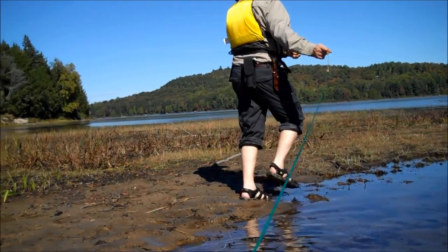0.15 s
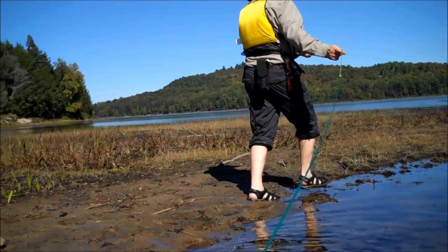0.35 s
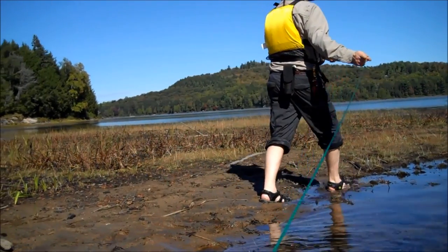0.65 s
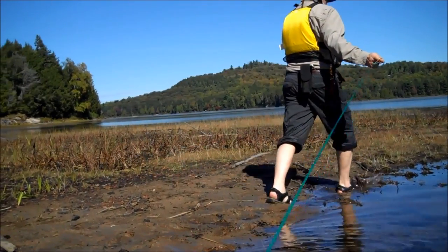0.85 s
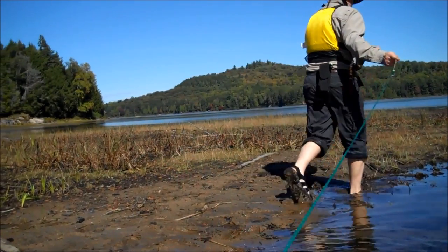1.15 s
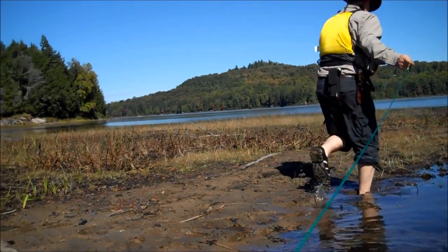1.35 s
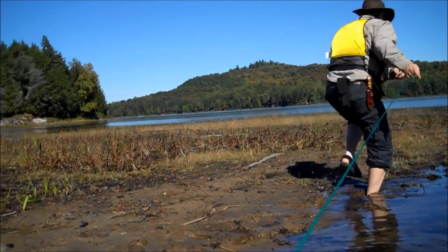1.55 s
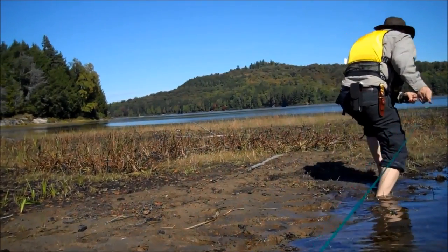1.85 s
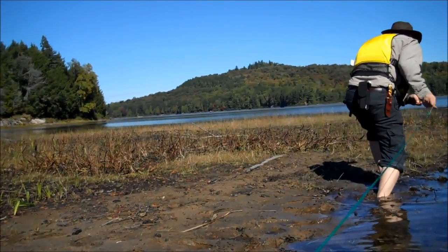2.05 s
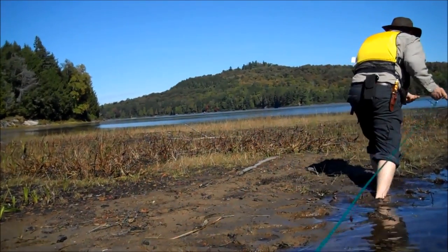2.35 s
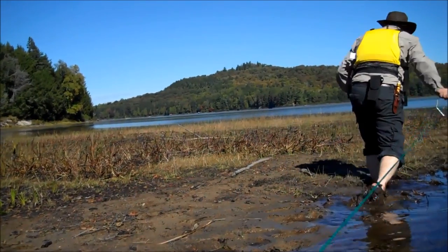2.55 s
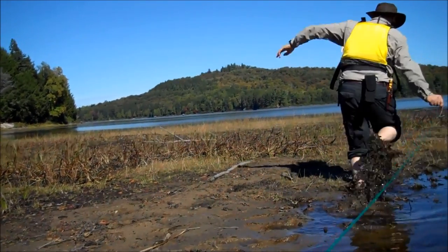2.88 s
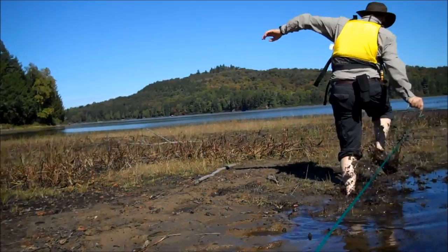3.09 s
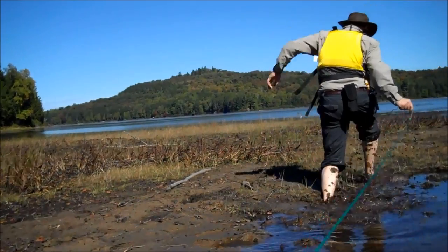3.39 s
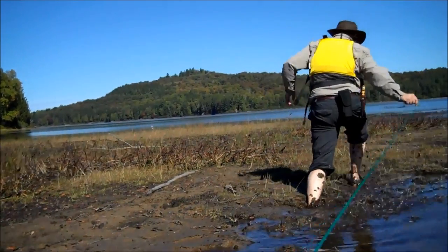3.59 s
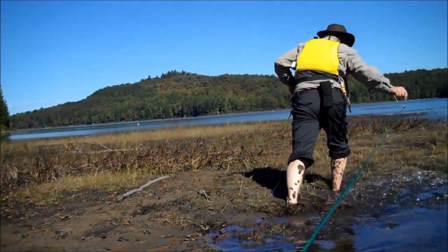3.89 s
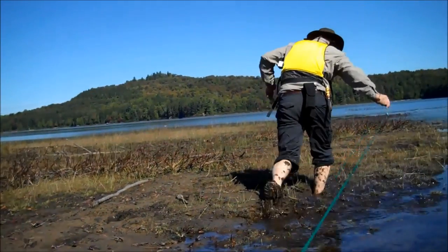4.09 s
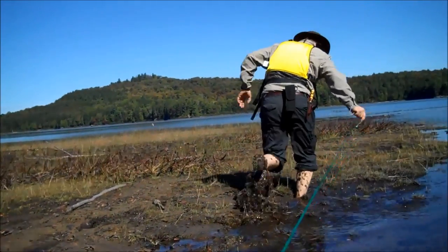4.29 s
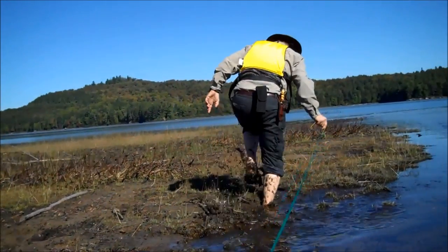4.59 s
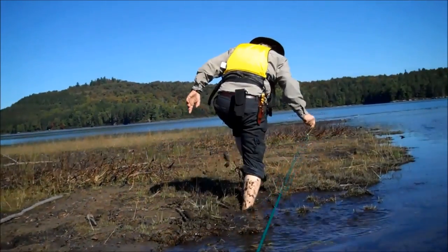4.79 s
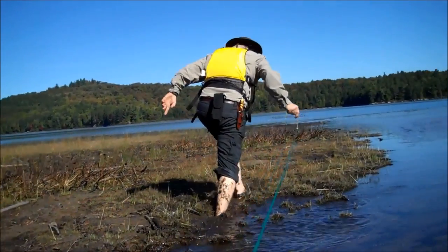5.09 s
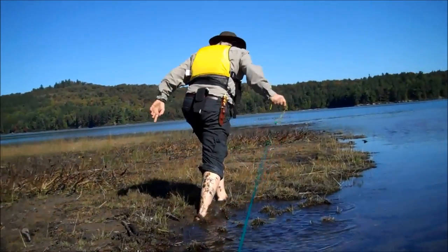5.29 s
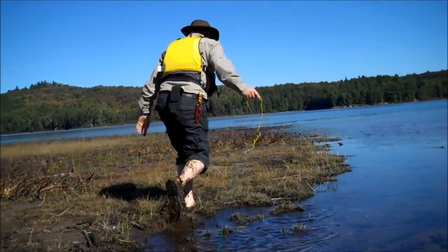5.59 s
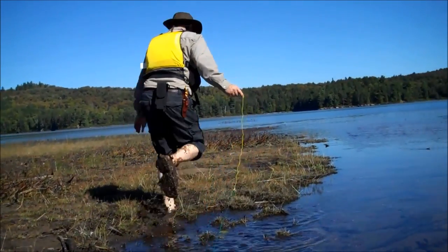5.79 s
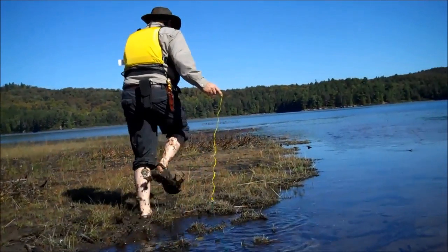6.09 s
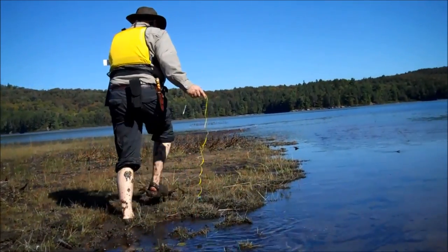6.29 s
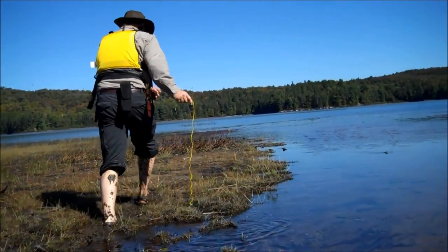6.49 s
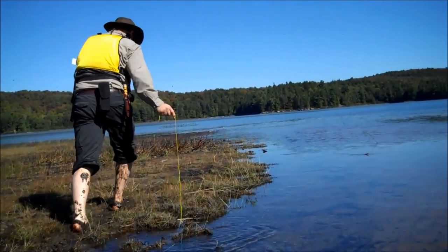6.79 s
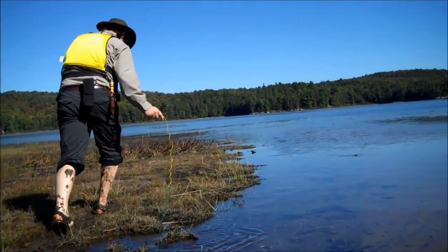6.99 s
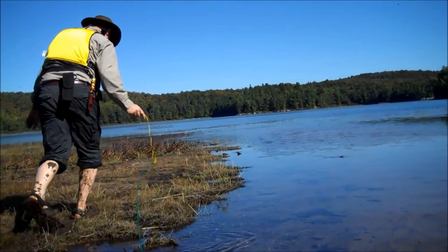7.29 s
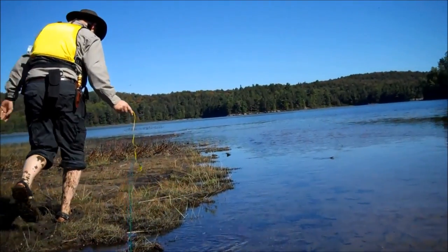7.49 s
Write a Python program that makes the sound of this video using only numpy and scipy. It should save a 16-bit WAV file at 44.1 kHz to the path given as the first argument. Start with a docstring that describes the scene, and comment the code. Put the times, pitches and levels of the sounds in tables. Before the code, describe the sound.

Sandalled feet squelch and suck through wet mud and splash in shallow water, with sharp wet snaps, bubbling gurgles and a faint bird call.

```python
"""Wet snaps and squelches: sandalled feet sink into mud and shallow water on a lake shore, right to centre.
Clumped bubble grains make spray, fizz, gurgle and suck; sliding sines ring air pockets; noise bursts snap.
A small bird calls in gliding sines; shaped noise gives the still air and a light breeze.
Two microphone ports ring near 3.7 kHz and limit bass and treble."""
import sys
import numpy as np
from scipy import signal
from scipy.fft import rfft, irfft
from scipy.io import wavfile
from scipy.ndimage import map_coordinates

SR = 44100
rng = np.random.default_rng(int(sys.argv[2]) if len(sys.argv) > 2 else 0)


def int16_out(signal):
    """Quantize to a 16-bit WAV file."""
    q = np.round(np.clip(np.atleast_2d(signal).T, -1, 1) * 32767)
    wavfile.write(sys.argv[1], SR, q.astype(np.int16))


N = 337365


def from_db(db):
    """Decibels to amplitude gain."""
    return 10 ** (np.asarray(db) / 20)


def rms_one(x):
    """Scale to rms 1."""
    return x / np.sqrt(np.mean(x ** 2) + 1e-20)


def in_time(rows):
    """Table columns as linear curves over all samples."""
    time_s, *columns = np.transpose(rows)
    return [np.interp(np.arange(N) / SR, time_s, column) for column in columns]


def drift(rate_hz):
    """Slow random curve, rms 1: noise through a two-pole lowpass, computed every 40 samples."""
    pole = np.exp(-2 * np.pi * rate_hz * 40 / SR)
    noise = rng.standard_normal(N // 40 + 2002)
    slow = signal.lfilter([1], [1, -2 * pole, pole ** 2], noise)[2000:]  # settled part
    return np.interp(np.arange(N) / 40, np.arange(len(slow)), rms_one(slow))


def add(out, start_s, sound):
    """Mix a sound in at start_s."""
    i = round(start_s * SR)
    out[i:i + len(sound)] += sound[:N - i]


def late(x, samples):
    """Delay x by a fractional number of samples."""
    return map_coordinates(x, [np.arange(N) - samples], order=3, mode="nearest")


def bell(x, hz, width_hz):
    """The part of x inside one resonance."""
    return signal.lfilter(*signal.iirpeak(hz, hz / width_hz, fs=SR), x)


def above(x, hz):
    """Highpass: small sources radiate no bass."""
    return signal.sosfilt(signal.butter(2, hz, "high", fs=SR, output="sos"), x)


EDGE_DB = 15  # loss one rise or fall time away from the top


def swells(rows, rise_bend, fall_bend):
    """Summed power curves of rows (top_s, rise_s, fall_s, level_db, ..); bends set flank steepness."""
    t = np.arange(0, N + 64, 64) / SR
    power = 0
    for top_s, rise_s, fall_s, *level_db in rows:
        rise = np.abs((t - top_s) / rise_s) ** rise_bend
        fall = np.abs((t - top_s) / fall_s) ** fall_bend
        loss_db = np.minimum(EDGE_DB * np.where(t < top_s, rise, fall), 200)
        power = power + from_db(np.c_[level_db] - loss_db) ** 2
    return np.array([np.interp(np.arange(N) / SR, t, p) for p in power])


AIR_DB = -54
# spectrum of still air over the lake: pitch_hz [Hz], level_db [dB per Hz]
AIR_SPECTRUM = [(30, -7.5), (100, -5), (190, -5), (300, 0), (600, -1), (1500, -4.5), (3000, -10),
                (5000, -10), (7500, -2.5)]


def still_air():
    """Steady far hush: shaped noise, alike at both ports only in the bass."""
    hz = np.maximum(np.fft.rfftfreq(N, 1 / SR), 1)
    pitch_hz, level_db = np.transpose(AIR_SPECTRUM)
    colour = from_db(np.interp(np.log(hz), np.log(pitch_hz), level_db))
    alike = .9 / (1 + (hz / 1800) ** 2)
    mid, side = rfft(rng.standard_normal((2, N)))
    mid, side = np.sqrt(1 + alike) * mid, np.sqrt(1 - alike) * side
    both = colour * np.array([mid + side, mid - side])
    return from_db(AIR_DB) * rms_one(irfft(both, N))


CALM_DB, GUST_RISE_S, GUST_FALL_S = -73, .14, .2
# breeze gusts: top_s [s], level_db [dB]
GUST_TOPS = [(1.04, -67), (2.05, -59), (2.17, -57), (2.58, -60), (3.24, -59), (3.45, -62), (3.7, -63),
             (3.93, -61), (4.41, -66), (5.2, -66), (5.42, -66), (6.4, -60)]


def breeze():
    """Lumpy 16-60 Hz pressure on the ports, partly its own in each."""
    shared, left, right = rng.standard_normal((3, N))
    band = signal.butter(2, [16, 60], "band", fs=SR, output="sos")
    lumps = signal.sosfilt(band, [.55 * shared + left, .55 * shared + right])
    rows = [(top_s, GUST_RISE_S, GUST_FALL_S, level_db) for top_s, level_db in GUST_TOPS]
    power = swells(rows, 0.78, 1.3)[0]
    level = np.sqrt(from_db(CALM_DB) ** 2 + power) * from_db(1.3 * drift(6.3))
    return level * rms_one(lumps)


FLUTTER_DB = 2.2  # rms of the random level flutter
# bird calls: start_s [s], length_s [s], first_hz [Hz], last_hz [Hz], level_db [dB]
BIRD_CALLS = [(.988, .142, 3980, 2300, -47.5), (2.852, .136, 3900, 2300, -52),
              (6.765, .085, 3500, 2300, -53), (6.995, .127, 3400, 2050, -45.5),
              (7.315, .155, 2400, 1720, -54)]
# shape of each call: along [share of length], fallen [share of pitch fall], shape_db [dB]
CALL_SHAPE = [(0, 0, -18), (.1, .06, -6), (.27, .22, -2), (.5, .19, 0), (.63, .54, -5), (.84, .64, -2),
              (1, 1, -12)]


def bird():
    """Falling whistles: near-pure sines that share one pitch and level shape."""
    out = np.zeros(N)
    along, fallen, shape_db = np.transpose(CALL_SHAPE)
    for start_s, length_s, first_hz, last_hz, level_db in BIRD_CALLS:
        x = np.arange(0, length_s, 1 / SR) / length_s
        hz = first_hz + (last_hz - first_hz) * np.interp(x, along, fallen)
        level = from_db(level_db + np.interp(x, along, shape_db))
        add(out, start_s, level * np.sin(2 * np.pi * np.cumsum(hz) / SR))
    return out * from_db(FLUTTER_DB * drift(40))


def scatter(x):
    """Grass, mud and legs throw a few milliseconds of treble echoes, other ones to each port."""
    t = np.arange(900) / SR
    echoes = rng.standard_normal((2, len(t))) * from_db(-60 * t / .018)
    bright = signal.lfilter(*signal.butter(1, 2500, "high", fs=SR), x)
    return signal.fftconvolve(bright[None], rms_one(echoes) / 30, axes=1)[:, :N]


SEEP_FIZZ_DB = -0.5  # over the mean of spray and gurgle
RISE_BEND, FALL_BEND = 1.01, 1.14
# quiet seeping between surges: time_s [s], spray_db [dB], gurgle_db [dB], suck_db [dB]
SEEPING = [(0, -65.5, -68, -87), (.3, -74, -95, -85), (.38, -64, -75, -74), (.45, -62, -64, -82),
           (.75, -58, -57, -80), (1.15, -62, -64, -63.5), (1.65, -61, -61, -64), (1.85, -65, -62.5, -66),
           (2.22, -65, -56.5, -56.5), (2.5, -58, -52.5, -49), (3.05, -59.5, -55, -53),
           (3.47, -44, -52.5, -70), (3.65, -53, -58.5, -70.5), (4.05, -50.5, -49.5, -55),
           (4.25, -60, -55.5, -67), (4.6, -54, -56, -57.5), (4.78, -61.5, -61.5, -66.5),
           (5.0, -51, -54.5, -63), (5.25, -62, -57.5, -54.5), (5.75, -58, -63.5, -69),
           (6.25, -60.5, -61, -70), (6.6, -58.5, -56, -64.5), (6.95, -56.5, -58, -58),
           (7.3, -63.5, -65, -74), (7.65, -59, -65, -87)]
# surges as a foot presses in or pulls out:
# top_s [s], rise_s [s], fall_s [s], spray_db [dB], fizz_db [dB], gurgle_db [dB], suck_db [dB]
FOOT_SURGES = [(.402, 0.0097, .09, -46.5, -47.5, -73, -63), (.51, 0.074, 0.086, -57.5, -45.5, -56.5, -79),
               (.59, 0.087, 0.052, -40.5, -46, -50, -57), (.7, 0.014, 0.027, -66, -65, -53, -82),
               (.79, 0.018, 0.025, -59, -53, -53, -80), (.84, 0.027, .02, -51, -57, -53, -77),
               (.89, 0.036, 0.13, -52.5, -48.5, -48, -72), (1.0, 0.09, 0.03, -51.5, -59, -50, -70),
               (1.21, 0.064, 0.016, -51, -56, -52.5, -59), (1.29, 0.019, .025, -53.5, -63, -49.5, -67),
               (1.365, 0.014, 0.037, -50, -45, -61, -76), (1.52, 0.024, 0.049, -69, -62, -55, -56),
               (1.59, 0.028, 0.033, -51.5, -62, -58, -67), (1.735, 0.024, 0.064, -40.5, -45, -46, -48.5),
               (1.96, 0.01, 0.0087, -40.5, -62, -62, -58), (2.09, 0.12, 0.051, -52, -50.5, -52, -53),
               (2.175, 0.045, 0.052, -52.5, -48.5, -49, -42), (2.32, 0.057, 0.063, -49, -43.5, -39.5, -73),
               (2.368, 0.016, .12, -43, -38.5, -34, -37), (2.6, 0.22, 0.22, -50, -45, -43.5, -59),
               (2.82, .09, 0.44, -50.5, -49, -54, -58.5), (3.18, 0.018, .1, -49, -58, -68, -57),
               (3.28, 0.067, 0.084, -39.5, -39.5, -67, -80), (3.32, 0.034, 0.051, -31, -40, -44, -61),
               (3.39, 0.077, 0.044, -43.5, -40.5, -36, -45), (3.68, 0.036, 0.33, -51, -49.5, -59, -72),
               (3.76, 0.017, 0.07, -48, -43, -54, -45), (3.86, 0.047, 0.059, -44.5, -41, -38, -42),
               (3.99, 0.11, 0.13, -63, -63, -48.5, -41), (4.17, .05, 0.024, -49, -60, -64, -62),
               (4.265, 0.0067, 0.055, -50.5, -52, -62, -60), (4.45, 0.027, 0.12, -57.5, -53, -50, -62),
               (4.575, 0.017, 0.011, -53, -51, -65, -62), (4.678, 0.023, 0.014, -45.5, -62, -57, -54),
               (4.73, 0.041, 0.031, -43.5, -51, -49, -53.5), (4.79, .018, 0.093, -46, -64, -53, -71),
               (4.86, 0.03, 0.092, -39, -44, -41, -49), (4.922, 0.021, 0.031, -28.5, -33.5, -34.5, -47),
               (5.03, 0.033, 0.017, -63, -47, -52, -60), (5.066, .006, .012, -41, -42, -46, -67),
               (5.092, 0.019, 0.01, -40, -41, -39, -67), (5.16, 0.12, 0.087, -50.5, -55, -47.5, -54),
               (5.28, 0.062, 0.37, -53, -52.5, -52, -53), (5.39, 0.023, .02, -46, -43, -37, -47.5),
               (5.44, 0.026, 0.034, -53, -44.5, -48, -41.5), (5.55, 0.14, 0.19, -51.5, -53, -49, -66),
               (6.31, 0.025, 0.099, -48.5, -72, -66, -69), (6.412, 0.017, 0.027, -38, -39, -38, -48),
               (6.45, 0.04, 0.063, -39, -40, -41.5, -50), (6.49, 0.023, 0.017, -43.5, -50.5, -49, -52.5),
               (6.67, 0.015, 0.11, -47, -67, -58, -67), (6.75, 0.047, 0.044, -40.5, -46, -55, -53),
               (6.85, 0.018, 0.031, -47, -43, -46, -58), (6.897, 0.029, 0.031, -42.5, -37.5, -37, -35.5)]


def effort():
    """Gains of spray, fizz, gurgle and suck: seeping and surges add in power."""
    spray_db, gurgle_db, suck_db = in_time(SEEPING)
    fizz_db = (spray_db + gurgle_db) / 2 + SEEP_FIZZ_DB
    seep = from_db([spray_db, fizz_db, gurgle_db, suck_db])
    return np.sqrt(seep ** 2 + swells(FOOT_SURGES, RISE_BEND, FALL_BEND))


def grains(low_hz, high_hz, per_s, t60_cycles, spread_db, clump_db, tilt_db_per_octave):
    """Clumped clicks of uneven size ring bubbles at 14 pitches; rms 1."""
    loudness_db = spread_db * np.minimum(rng.exponential(1, N), 4)
    sizes = from_db(loudness_db) * rng.choice([-1, 1], N)
    born = rng.random(N) < per_s * from_db(clump_db * drift(25)) / SR
    dealt = rng.integers(0, 14, N)
    out = 0
    for k, hz in enumerate(np.geomspace(low_hz, high_hz, 14)):
        pole = from_db(-60 * hz / (t60_cycles * SR))
        w = 2 * np.pi * hz / SR
        clicks = sizes * born * (dealt == k) + 1e-18  # keeps the filter off denormals
        rung = signal.lfilter([0, np.sin(w)], [1, -2 * pole * np.cos(w), pole ** 2], clicks)
        out = out + rung * from_db(tilt_db_per_octave * np.log2(hz / low_hz))
    return rms_one(above(out, 0.63 * low_hz))


def stirring(gains):
    """Fine spray, fizz with lone larger drops, middling bubbles and large sucking hollows."""
    spray = grains(2560, 7500, 4000, t60_cycles=12.0, spread_db=1.0, clump_db=5.5, tilt_db_per_octave=2.5)
    fizz = grains(1447, 2450, 1200, t60_cycles=13.0, spread_db=3.0, clump_db=4.5, tilt_db_per_octave=0.0)
    gurgle = grains(430, 1387, 600, t60_cycles=21.2, spread_db=1.5, clump_db=4.0, tilt_db_per_octave=7.0)
    suck = grains(169.0, 446, 300, t60_cycles=20.0, spread_db=5.5, clump_db=2.0, tilt_db_per_octave=10.0)
    return np.sum(gains * [spray, fizz, gurgle, suck], axis=0)


DROPLET_COUNT = 220
DROPLET_DB, DROPLET_SPREAD_DB = 10, 3.5  # level over the seeping gurgle, spread


def droplets():
    """Pocket rows, small, short and rising in pitch, at random moments."""
    when, size, pitch = rng.random((DROPLET_COUNT, 3)).T
    top_s = .4 + when * (N / SR - .5)
    time_s, _, gurgle_db, _ = np.transpose(SEEPING)
    level_db = np.interp(top_s, time_s, gurgle_db) + DROPLET_DB
    level_db = level_db - DROPLET_SPREAD_DB * np.log(1 - .95 * size)
    pitch_hz = 800 * 2 ** (2.1 * pitch)
    return [(s, db, hz, .15, 2.5) for s, db, hz in zip(top_s, level_db, pitch_hz)]


SWELL_SHARE = .6  # swell time over fade time
# air pockets and gulps: top_s [s], level_db [dB], pitch_hz [Hz, one swell time before the top],
# slide_octaves [octaves, from there to one fade time after the top], fade_cycles [cycles of pitch_hz]
AIR_POCKETS = [(.523, -34, 1250, .06, 3.5), (.602, -45, 970, .23, 3.1), (.706, -31.5, 700, 0.69, 3.7),
               (.819, -39, 835, -0.017, 2.9), (.842, -38, 1010, -.09, 3.1), (.995, -37.5, 846, 0.14, 4.5),
               (1.346, -40.5, 1429, .07, 3.5), (1.366, -41.5, 940, .07, 3.5), (1.738, -34, 1110, 0.21, 4.1),
               (1.772, -40.5, 440, .04, 2.9), (1.942, -37, 1290, 0.017, 4.4), (1.958, -54, 885, .12, 2.9),
               (2.064, -50, 960, 0.046, 7.1), (2.14, -44.5, 114, 0.071, 4.2), (2.167, -30.5, 957, .04, 3.4),
               (2.283, -43, 291, 0.46, 2.4), (2.321, -38.5, 930, -0.033, 8), (2.362, -33, 1112, 0.079, 18),
               (2.367, -16.5, 663, 0.18, 1.49), (2.392, -34, 230, 0.64, 4.3), (2.43, -43, 171, -0.03, 2.8),
               (2.445, -27, 537, 0.11, 1.8), (2.551, -33.5, 184, -0.22, 4), (2.556, -24, 360, 0.1, 0.84),
               (2.641, -39.5, 415, 0.11, 5.5), (2.719, -34.5, 473, 0.05, 2.9), (2.905, -34, 1070, .07, 3.6),
               (3.01, -40, 566, -.05, 3.3), (3.027, -35.5, 1320, 0.15, 3.3),
               (3.073, -29, 1470, -0.087, 3.7), (3.078, -37, 492, -0.061, 3.6),
               (3.152, -28.5, 1700, 0.067, 3.7), (3.248, -39, 1920, -0.07, 18),
               (3.281, -34.5, 1998, .09, 11), (3.318, -25, 1580, 0.23, 3.3), (3.328, -31, 1330, 0.2, 11),
               (3.395, -30, 583, -0.4, 3.1), (3.682, -32.5, 920, 0.12, 2.5), (3.776, -41, 190, .02, 1.9),
               (3.827, -33, 973, -.22, 5.1), (3.868, -30.5, 1140, -0.13, 3.5),
               (3.928, -34, 486, -0.09, 2.7), (3.931, -38.5, 770, -0.08, 4.3),
               (3.957, -39, 750, -0.016, 5.8), (3.976, -32, 230, 0.43, 4.9), (3.979, -34, 124, 0.27, 2.7),
               (4.015, -44, 336, -0.041, 8.1), (4.045, -33, 157, 0.055, 3.6),
               (4.072, -37.5, 950, -0.28, 6.3), (4.122, -38.5, 510, 0.022, 3.1),
               (4.266, -39, 790, 0.21, 2.9), (4.282, -35.5, 740, 0.13, 2.9),
               (4.337, -35.5, 950, -0.07, 2.9), (4.418, -41.5, 301, -0.08, 1.6),
               (4.611, -38, 1240, -.11, 4.1), (4.712, -33.5, 950, -0.21, 2.7), (4.865, -29, 256, -.09, 3.8),
               (4.929, -41, 567, -0.54, 1.9), (5.026, -31.5, 318, 0.0077, 2.2),
               (5.074, -31, 770, 0.26, 3.1), (5.086, -39.5, 320, 0.41, 2.9),
               (5.095, -27.5, 1040, 0.25, 2.8), (5.149, -30, 946, 0.25, 3.3), (5.329, -50, 109, 0.14, 4.4),
               (5.383, -24.5, 705, 0.071, 1.5), (5.435, -29.5, 850, 0.2, 4.1),
               (5.455, -40.5, 149, 0.43, 3.8), (5.496, -43.5, 176, -0.15, 4.4),
               (5.701, -51.5, 284, 0.27, 8.5), (5.728, -44, 490, -0.015, 2.9),
               (5.818, -45.5, 560, -0.35, 2.1), (5.855, -40, 540, .05, 3.6), (5.971, -45, 565, 0.014, 2.72),
               (6.041, -47, 486, -0.28, 7.4), (6.129, -43, 1064, 0.12, 4.2), (6.427, -34, 590, -.24, 3.15),
               (6.488, -31, 1000, -0.082, 4.2), (6.663, -43, 319, 0.14, 2.8), (6.734, -46, 325, 0.31, 11),
               (6.868, -38, 492, -0.31, 2.8), (6.894, -22, 1680, -0.046, 3.5),
               (6.899, -33, 312, -0.28, 5.3), (7.0, -40.5, 497, -0.073, 5.3),
               (7.057, -43.5, 1660, 0.099, 4.1), (7.398, -53, 565, -0.14, 6.2)]


def pockets():
    """An air pocket rings as a sine whose pitch slides while the mud reshapes it."""
    out = np.zeros(N)
    for top_s, level_db, pitch_hz, slide_octaves, fade_cycles in AIR_POCKETS + droplets():
        fade_s = fade_cycles / pitch_hz
        swell_s = SWELL_SHARE * fade_s
        t = np.arange(-2 * swell_s, 4 * fade_s, 1 / SR)
        loss_db = np.where(t < 0, 6.2 * (t / swell_s) ** 2, 10.9 * np.abs(t / fade_s) ** 0.72)
        slid = np.clip((t + swell_s) / (swell_s + fade_s), -.4, 1.6)
        hz = pitch_hz * 2 ** (slide_octaves * slid)
        tone = np.sin(2 * np.pi * np.cumsum(hz) / SR)
        add(out, top_s - 2 * swell_s, from_db(level_db - loss_db) * tone)
    return out


SNAP_T60_S, SPATTER_T60_S, SPATTER_DB = 0.0074, .035, -19.5
# wet snaps and drops: start_s [s], level_db [dB], ring_hz [Hz], ring_share [0-1]
WET_SNAPS = [(0.059, -32.5, 2020, .9), (.253, -26.5, 1970, 0.73), (.359, -23.5, 3370, 0.76),
             (.486, -20, 2170, 0.87), (0.555, -22, 4048, .4), (0.8006, -32, 3460, 0.53),
             (0.944, -23.5, 3820, 0.46), (1.192, -31, 3833, 0.9), (1.3438, -22.5, 1430, 0.24),
             (1.526, -27, 1507, 1), (1.7232, -23, 3650, 0.65), (1.7366, -22, 1870, 0),
             (1.768, -16, 2928, 0), (1.795, -24, 3650, 0), (1.911, -22.5, 3359, 0.27),
             (1.9577, -14.5, 1010, 0.2), (2.1522, -19, 1981, .55), (2.1675, -17, 3800, 0.2),
             (2.2882, -20.5, 1520, 0.95), (2.3516, -9, 3090, 0.27), (2.411, -17, 1248, .6),
             (2.442, -19, 2300, 0.2), (2.478, -19, 2540, 0.8), (2.8124, -19, 2196, 0.4),
             (3.074, -19.5, 1540, 0.64), (3.1152, -14.5, 2200, 1), (3.1494, -16.5, 1679, 0.1),
             (3.1915, -29, 3531, 0.5), (3.222, -23, 3400, 0.7), (3.25, -20.5, 3186, 0.5),
             (3.261, -11, 1440, 0.4), (3.2708, -28, 3500, 1), (3.313, -6, 990, 0.37),
             (3.3191, -8.5, 3600, 0.67), (3.41, -18, 1421, 0.8), (3.482, -13.5, 2160, .1),
             (3.506, -19, 3630, 0.14), (3.5455, -27, 3500, 0.3), (3.5913, -24, 1530, 1),
             (3.6097, -20.5, 3440, 0.45), (3.6888, -23, 2360, 0.75), (3.744, -12, 3380, 0.18),
             (3.7481, -12, 2870, 0.35), (3.859, -30, 904, 0.4), (3.896, -16.5, 3300, 0),
             (4.261, -23, 5000, .8), (4.4465, -29.5, 3340, 0.2), (4.5657, -23, 2610, .9),
             (4.61, -23.5, 1220, 0.23), (4.659, -28.5, 4050, 0.8), (4.6762, -22.5, 3380, 0.4),
             (4.7232, -17, 2010, 0.46), (4.7982, -26, 3600, 0.6), (4.8413, -14, 1600, 0.35),
             (4.8604, -19.5, 3570, .7), (4.901, -10, 3230, 0.05), (4.9182, -14, 1507, 0.1),
             (4.9212, -8, 3230, 0.73), (4.978, -26.5, 2240, .6), (5.0617, -15, 3430, 0),
             (5.069, -16, 2497, 0.5), (5.1307, -17.5, 2971, .2), (5.1455, -21, 3650, .3),
             (5.1771, -24, 2820, .8), (5.342, -19, 1660, 0.97), (5.5393, -31, 2780, 1),
             (5.7255, -31, 4320, 0.5), (5.7998, -28.5, 2282, 1), (6.1296, -21, 1076, 0.2),
             (6.2173, -20.5, 1170, 0.35), (6.205, -32, 3820, .8), (6.244, -26.5, 2713, .6),
             (6.2847, -22.5, 3730, 0.3), (6.3032, -18.5, 3440, 0), (6.3068, -22, 2497, .1),
             (6.3806, -15.5, 1119, 0.44), (6.408, -16.5, 3870, 0.5), (6.4189, -18, 1210, .2),
             (6.426, -21, 4091, .6), (6.4494, -12.5, 2980, 0.56), (6.494, -19, 1507, .9),
             (6.676, -28, 3300, 0.7), (6.7505, -23, 4080, 1), (6.762, -24, 4040, 0.9),
             (6.7725, -20, 3680, 0), (6.8442, -22.5, 3000, 0.75), (6.893, -21, 1520, 0.97),
             (6.9416, -31, 4120, .85), (7.2537, -36.5, 3880, 0.61), (7.5322, -33, 2180, 1)]


def snaps():
    """A water film tears at once: dying noise, partly tuned by the hollow behind it, then spatter."""
    out, t = np.zeros(N), np.arange(2000) / SR
    noise = rng.standard_normal((len(WET_SNAPS), len(t)))
    cracks = signal.lfilter(*signal.butter(1, 2500, fs=SR), noise)
    for (start_s, level_db, ring_hz, ring_share), crack in zip(WET_SNAPS, cracks):
        ring = .5 * ring_share * np.sin(2 * np.pi * ring_hz * t)
        body = ring + (1 - ring_share) * 0.52 * crack
        snap = from_db(level_db - 60 * t / SNAP_T60_S) * body
        spatter = from_db(level_db + SPATTER_DB - 60 * t / SPATTER_T60_S) * crack
        add(out, start_s, snap + spatter)
    return above(out, 680)


BIRD_LEFT_LATE_SAMPLES, BIRD_LEFT_DB = -4.7, -.8
# walker's direction: time_s [s], left_late [samples by which the left port hears late]
WALKER_LEFT_LATE = [(0, 3.5), (.6, 5), (3.7, 5.5), (4.3, 3), (5.3, 2.5), (6.0, 0.5), (6.8, 0.5), (7.65, -1)]


def scene():
    """Walker, bird and air at the two ports, placed by arrival delays."""
    left_late = in_time(WALKER_LEFT_LATE)[0]
    gains = effort()
    feet = stirring(gains) + snaps() + pockets()
    song = bird()
    around = from_db(-8) * stirring(gains)  # mud and water a step to the side, from another angle
    left = late(feet, left_late) + late(around, left_late - 3.5)
    left = left + from_db(BIRD_LEFT_DB) * late(song, BIRD_LEFT_LATE_SAMPLES)
    right = feet + around + song
    return np.array([left, right]) + from_db(-28.5) * scatter(feet) + still_air() + breeze()


CUTOFF_HZ = 7090
# microphone ports, rows left and right: ring_hz [Hz], width_hz [Hz], lift_db [dB], dip_hz [Hz],
# dip_depth [0-1], treble_hz [Hz, corner], bass_hz [Hz, corner], gain_db [dB]
MIC_PORTS = [(3750, 650, 17.5, 5030, .35, 6200, 185, 4.5), (3600, 440, 17.5, 6700, .44, 3640, 105, 5)]


def record(dry):
    """Each port lifts its own resonance, dips above it and loses treble and bass; the top is cut."""
    out = []
    for x, port in zip(dry, MIC_PORTS):
        ring_hz, width_hz, lift_db, dip_hz, dip_depth, treble_hz, bass_hz, gain_db = port
        x = x + (from_db(lift_db) - 1) * bell(x, ring_hz, width_hz)
        x = x - dip_depth * bell(x, dip_hz, 1400)
        x = signal.lfilter(*signal.butter(2, treble_hz, fs=SR), x)
        x = signal.lfilter(*signal.butter(1, bass_hz, "high", fs=SR), x)
        out.append(from_db(gain_db) * x)
    steep = signal.ellip(12, .3, 80, CUTOFF_HZ, fs=SR, output="sos")
    return signal.sosfilt(steep, out)


dry = scene()
out = record(dry)
int16_out(out)
```